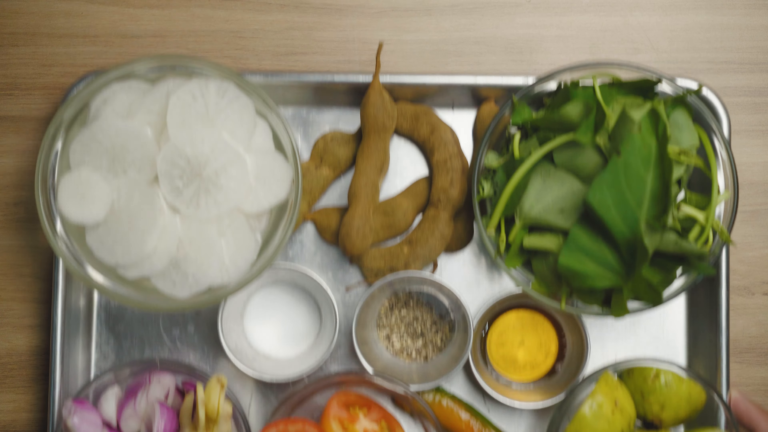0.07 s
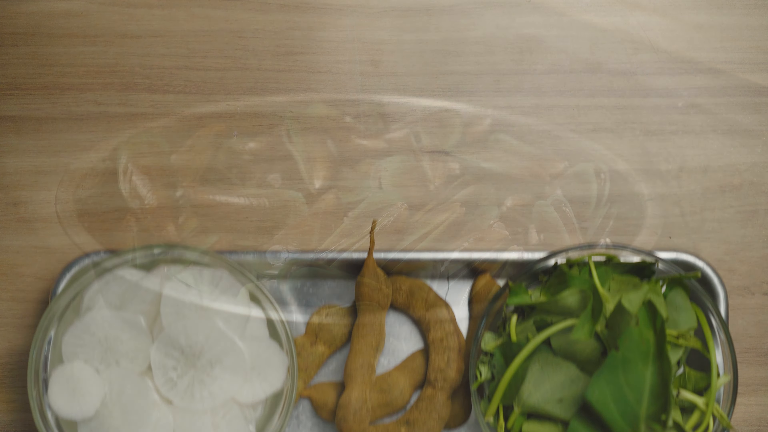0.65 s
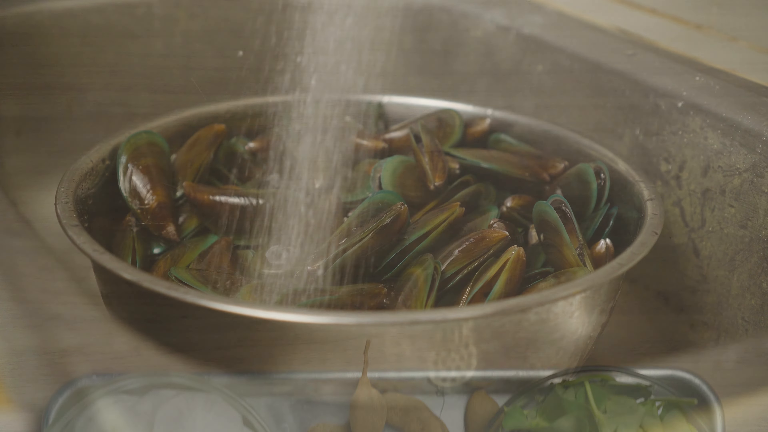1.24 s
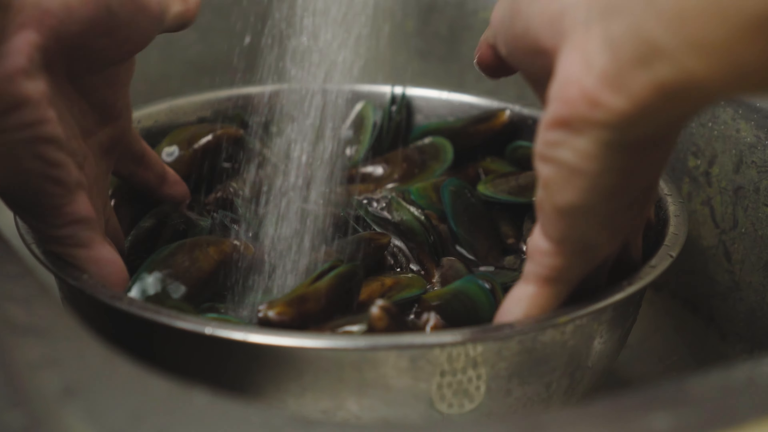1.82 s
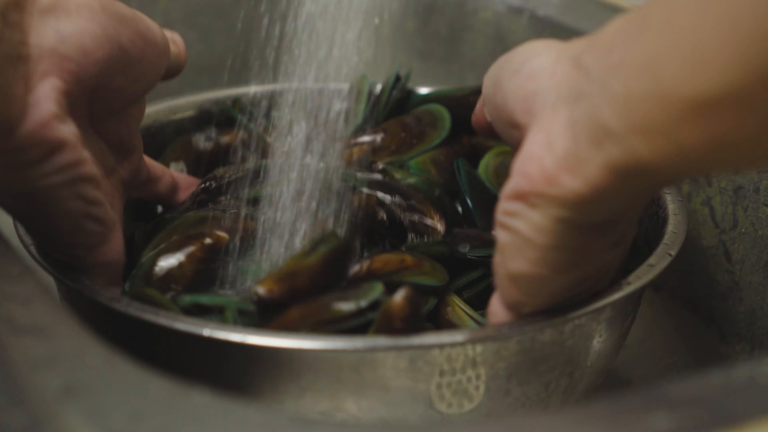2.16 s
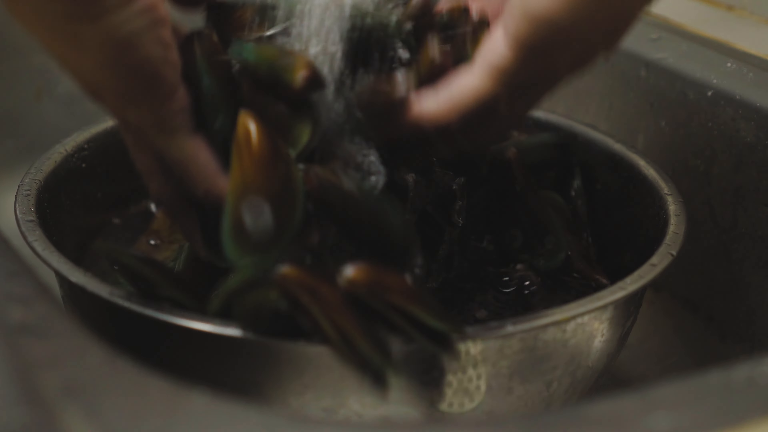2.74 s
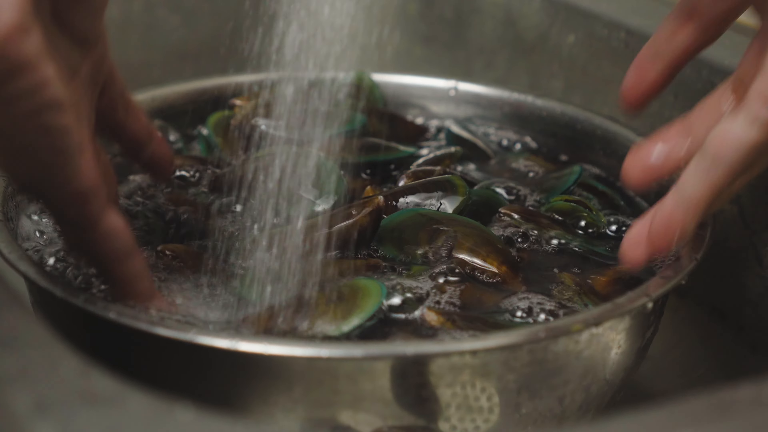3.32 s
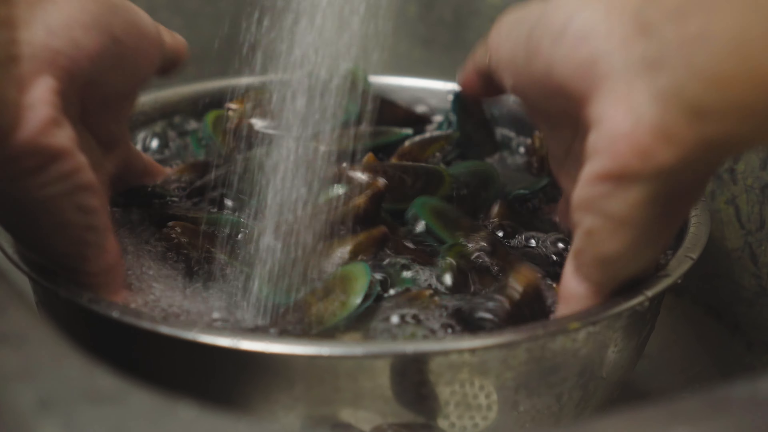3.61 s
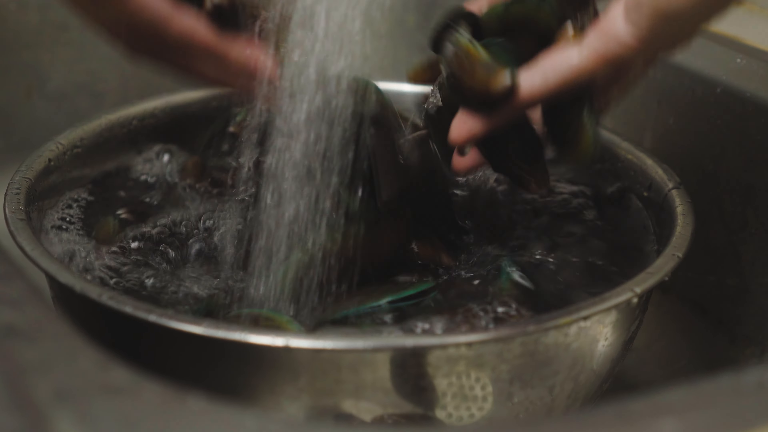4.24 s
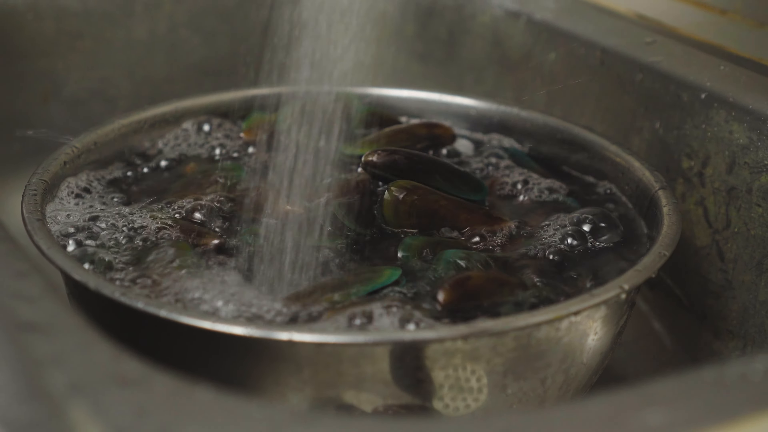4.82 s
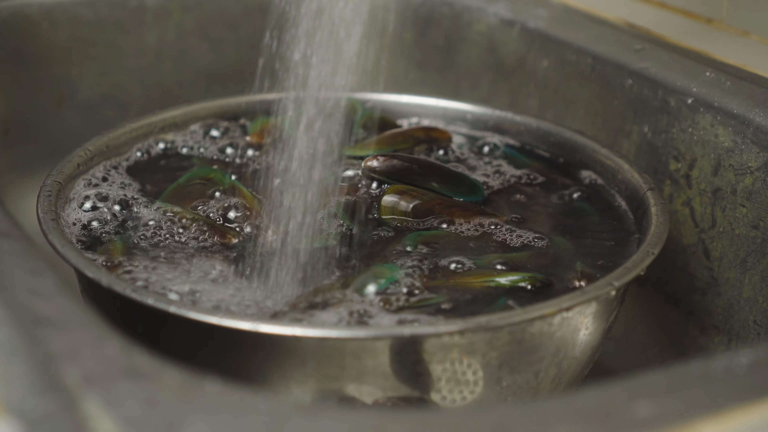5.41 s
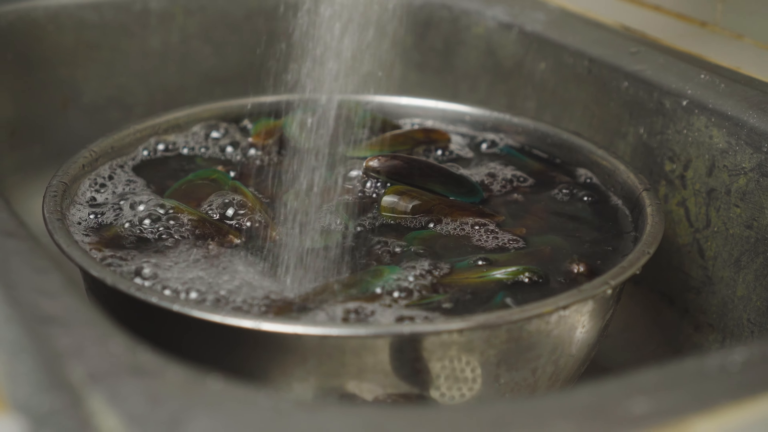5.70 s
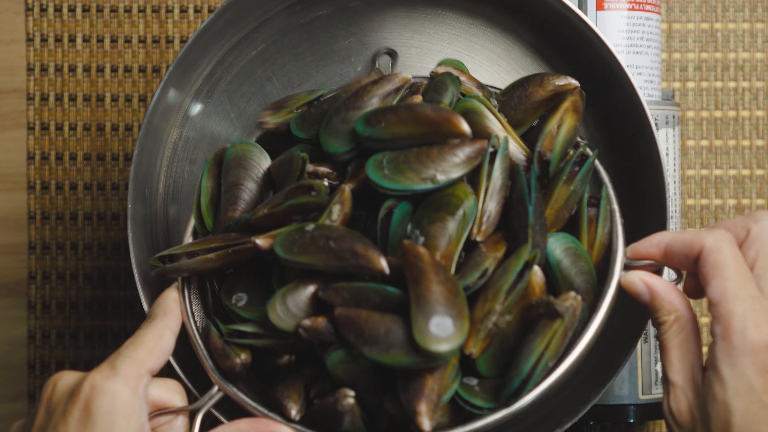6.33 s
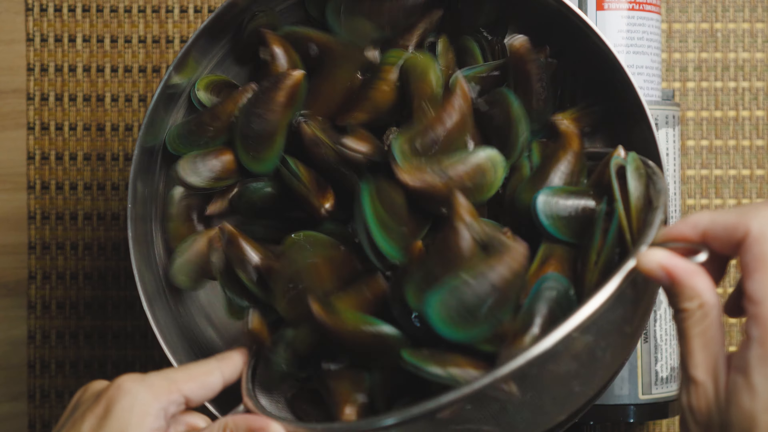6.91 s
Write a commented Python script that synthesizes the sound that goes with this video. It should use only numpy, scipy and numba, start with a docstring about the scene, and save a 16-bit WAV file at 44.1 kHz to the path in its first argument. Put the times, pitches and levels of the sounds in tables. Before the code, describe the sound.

A steel tray slides over a wooden counter with a soft, fading hiss. A spray tap spurts on and spatters onto mussels in a steel bowl, growing bubblier as water gathers. Hands scoop the shells twice and let them fall, clacking, while the bowl rumbles and thumps in the sink. The water dies away, and the mussels clatter into a ringing steel pot. The microphone is close, in a small kitchen.

```python
"""A small kitchen, one microphone close to the sink. A steel tray slides over the wooden counter, hissing
with fine stick-slip. A spray tap spatters onto mussels in a steel bowl and bubbles as the water gathers.
Two hands scoop the shells up twice and let them fall, clacking, while the bowl rumbles and thumps on the
sink floor. The water dies away and the mussels are tipped from a strainer into a ringing steel pot."""
import sys
import numpy as np
from scipy import signal
from scipy.fft import rfft, irfft
from scipy.io import wavfile
from scipy.ndimage import uniform_filter1d
from numba import njit

SR = 44100
rng = np.random.default_rng(int(sys.argv[2]) if len(sys.argv) > 2 else 0)


def wav_out(sig):
    """Save sig, one row per channel (or a flat mono array), as 16-bit PCM at SR to the path in sys.argv[1]."""
    wavfile.write(sys.argv[1], SR, np.round(np.clip(np.atleast_2d(sig).T, -1, 1) * 32767).astype(np.int16))


N = 311346
TIME = np.arange(N) / SR
TOP_HZ = 16000

# the two scoops: hands dig in t/s, taking hold/s, pressing on the bowl/s, shells in motion/s
SCOOPS = [(1.854, 0.0073, 0.52, 1.405), (3.696, 0.066, 0.17, 1.084)]


def spray():
    """Droplets spatter on bare shells; as the bowl fills they land in water and blow small bubbles."""
    # spectrum of drops on shell: f/Hz, level/dB
    on_shells = [(350, -50), (600, -34), (894, -23.5), (1040, -6.5), (1780, -14.5), (3040, -14),
                 (4050, -5.5), (6730, -5.5), (14900, -5), (16000, -16.5)]
    # spectrum of drops on water: f/Hz, level/dB
    on_water = [(400, -51.5), (700, -30), (1000, -8), (1300, -2.5), (1850, -5), (2250, -0.5), (2750, 1.5),
                (3100, -1.5), (3600, 3), (4500, -2), (7200, 0), (10000, -1), (16000, -8)]
    filled = np.interp(TIME, [2.3, 4.8], [0, 1])
    drops = impacts(6000, 3.8) * flutter(260, 2.8)
    spatter = steady(colour(drops, on_shells), 5400, 24000)
    bubbles = steady(grains(3000, 3.5, 26, 700, 16000, glide=.12), 900, 16000)
    splashes = steady(impacts(9000, 2.5), 900, 16000)
    froth = colour((bubbles + splashes) * flutter(260, 2.66), on_water)
    froth = steady(froth, 8200, 16000)
    return undb(.5) * (np.sqrt(1 - filled) * spatter + np.sqrt(filled) * froth) * jet()


def jet():
    """Strength of the jet: an opening surge, a hush on the heaped handful, a fall as the valve closes."""
    opens_s, shut_s, closing_s = 1.19, 6.337, .54
    valve = np.clip((shut_s - TIME) / closing_s, 0, 1) ** 1.83
    surge_db = 9.5 * np.exp(-np.maximum(TIME - opens_s, 0) / .42)
    hush_db = -11 * swell(3.33, .38)
    return undb(-35.5 + surge_db + hush_db) * valve * gate(opens_s, shut_s, .011, .01)


def spurts():
    """Slugs of water slap the shells as the tap opens, with a soft gurgle underneath."""
    # first slugs out of the tap: t/s, relative level/dB
    slugs = [(1.1788, -11), (1.2026, -6.5), (1.229, -4), (1.3, -4), (1.331, -9)]
    slaps = band(sum(undb(db) * burst(s, t60=.028) for s, db in slugs), 3350, 8100)
    gurgle = steady(band(impacts(400, 1.5), 337, 496), 300, 520) * swell(1.27, .045)
    return undb(.5) * slaps + undb(-41.5) * gurgle


def pool():
    """The jet bubbles in the gathered water; the hollow of the bowl favours three bands."""
    bubbles = grains(700, 2.7, 35, 1000, 4350, glide=.15)
    favoured = (band(bubbles, 1270, 1470) + undb(5) * band(bubbles, 2730, 2740)
                + undb(-5) * band(bubbles, 3450, 3800))
    return undb(-45.5) * steady(favoured, 900, 4000) * gate(4.9, 5.95, .03, .059)


def hollow():
    """The jet drums in a hollow between the shells until the hands first dig in."""
    drumming = steady(band(impacts(900, 2.5), 960, 1160), 850, 1300)
    return undb(-40.5) * drumming * gate(1.533, SCOOPS[0][0], .058, .014)


def trickle():
    """As the valve closes, the last drops blow tiny bubbles in the full bowl, ever more faintly."""
    from_s, to_s, fade_db_per_s = 6.09, 6.42, 73
    drips = steady(band(grains(260, 3.4, 30, 2000, 7200, glide=.12), 2500, 5500), 2000, 7000)
    fade = undb(-51.5 - fade_db_per_s * np.maximum(TIME - from_s, 0))
    return drips * fade * gate(from_s, to_s, .08, .01)


def hands():
    """How hard the hands drive shell faces, shell edges and the bowl: scoops, with shoves on top."""
    # shoves through the shells: t/s, length/s, face drive/dB, edges relative to faces/dB, bowl drive/dB
    shoves = [(1.864, 0.027, -28, -25, -29), (2.012, 0.023, -35, -5, -29.5),
              (2.25, 0.048, -21.5, -12, -26.5), (2.473, 0.022, -17.5, -6, -36),
              (2.567, 0.086, -25.5, 3, -36.5), (2.70, 0.047, -18.5, 0.5, -39.5),
              (2.788, 0.013, -15.5, 2, -31), (2.975, 0.18, -24.5, -1.5, -42), (3.708, 0.15, -32, -3, -32),
              (3.865, 0.11, -17.5, -6, -35.5), (4.047, 0.17, -24.5, -9, -45),
              (4.15, 0.092, -19.5, -4.5, -37.5), (4.257, .11, -19, 1.5, -35), (4.557, 0.049, -24, 6, -38.5),
              (4.69, 0.067, -31, 7.5, -53), (4.837, 0.033, -26.5, -3, -46)]
    release_s = .024
    moving = sum(gate(s, s + length, grip, release_s) for s, grip, _, length in SCOOPS)
    pressing = sum(gate(s, s + press, grip, release_s) for s, grip, press, _ in SCOOPS)
    jostle = undb(-37.5) * moving
    faces, edges = [jostle], [jostle]
    rumble = [undb(-39) * pressing, undb(-47.5) * moving]
    for s, length, face_db, edge_db, rumble_db in shoves:
        shove = gate(s, s + length, .017, .056)
        faces.append(undb(face_db) * shove)
        edges.append(undb(face_db + edge_db) * shove)
        rumble.append(undb(rumble_db) * shove)
    return together(faces), together(edges), together(rumble)


def shells(face_drive, edge_drive):
    """Handfuls of shells grind and tumble: flat faces knock low, edges tick high."""
    # spectrum of tumbling shells: f/Hz, level/dB
    spectrum = [(300, -37.5), (550, -10.5), (750, -4.5), (1150, 5), (2000, 1.5), (4000, -7.5),
                (7000, -12.5), (9000, -21), (16000, -26)]
    # single knocks of shell on shell: t/s, relative level/dB, f/Hz, crack offset/dB
    collisions = [(1.0961, -22.5, 3960, -15), (2.0367, -7.5, 3420, -11), (2.4985, 1, 2800, -28),
                  (2.5478, 0, 3220, -19), (2.6373, 4, 4610, -32.5), (2.696, 5, 3320, -23.5),
                  (2.7848, -3.5, 3840, -22), (2.7943, -3.5, 1000, -17.5), (2.801, -0.5, 2130, -22),
                  (2.8174, -3, 2130, -14.5), (2.9379, -7, 1150, -14.5), (3.2941, -10.5, 3850, -24),
                  (3.7187, -6.5, 1410, -22), (3.851, -6, 1310, -32), (4.1353, -2.5, 1180, -24),
                  (4.2113, -5, 1070, -27), (4.252, 5, 3280, -21), (4.2933, -1.5, 2440, -15),
                  (4.348, -4, 3280, -22), (4.4945, -5.5, 4470, -6), (4.5308, -4.5, 1620, -9),
                  (4.5628, 0, 2700, -15), (4.581, 3, 2690, -14.5), (4.607, 1.5, 2890, -17),
                  (4.7034, 2, 2230, -18.5), (4.8046, 1.5, 1650, -31), (4.8181, 1, 1630, -15.5),
                  (4.8417, -3, 1510, -11.5)]
    faces = grains(650, 2.7, 17, 600, 4200, count=3) * flutter(70, 2)
    edges = grains(650, 3.0, 22, 2600, 15000, count=4) * flutter(70, 2)
    faces = steady(colour(faces, spectrum), 800, 4200) * face_drive
    edges = steady(colour(edges, spectrum), 3000, 5300) * edge_drive
    knocks = clacks(collisions, cycles=33, crack_db=14.5, chatter_db=-8, chatter_t60=.034)
    return undb(-2.5) * faces + undb(-3.5) * (edges + knocks)


def clacks(table, cycles, crack_db, chatter_db, chatter_t60):
    """Each blow is a sharp crack, a brief inharmonic ring and a chatter as the shell settles."""
    sizes = np.array([.7, .22, .22, -.14])
    out = np.zeros(N)
    for s, db, hz, offset_db in table:
        ratios = np.array([1, rng.uniform(.7, .9), rng.uniform(1.1, 1.4), rng.uniform(1.6, 2.4)])
        life = cycles * ratios * np.sqrt(hz / 1500)
        ring = rings(np.full(4, s), np.minimum(hz * ratios, TOP_HZ), life, sizes, 0.)
        chatter = band(burst(s, chatter_t60), hz / 1.14, hz * 1.42)
        crack = burst(s, t60=.015) * undb(crack_db + offset_db)
        out += undb(db) * (ring + undb(chatter_db) * chatter / np.abs(chatter).max() + crack)
    return band(out, 1000, 21000, order=4)


def bowl(drive):
    """The bowl judders on the sink under the hands, booms as a handful drops and hums under the jet."""
    # spectrum of the judder: f/Hz, level/dB
    spectrum = [(30, -43.5), (100, -20.5), (212, 1), (270, -2.5), (430, 0), (700, -14.5), (1300, -37)]
    # modes of the water-loaded bowl on the sink floor: f/Hz, level/dB, t60/s
    modes = [(399, -4.5, 0.071), (417.4, -15.5, .27), (449.6, 0.5, 0.091), (492, -11.5, 0.39),
             (590, -12, 0.02), (950, -20, 0.23)]
    # blows on the bowl's bottom: t/s, relative level/dB
    thumps = [(2.021, -24), (2.8605, -2), (2.886, -5), (2.923, -3), (2.965, -8.5), (3.068, -15)]
    judder = steady(colour(impacts(450, 2.2), spectrum), 120, 600)
    falling = gate(2.89, 3.01, .011, .057)
    patter = steady(struck(impacts(400, 2.4), modes), 120, 600) * falling
    boom = band(undb(-17.5) * patter + undb(3) * struck(blows(thumps), modes), 410, 3000)
    hum = steady(band(impacts(2000, 2), 150, 600, order=1), 120, 600) * jet()
    return undb(-1.5) * judder * drive + boom + undb(-37) * hum


def plops():
    """Trapped air rings for a few dozen cycles, rising a little in pitch."""
    # air pockets closing over the dropped shells: t/s, f/Hz, level/dB
    pockets = [(2.925, 916, -20), (2.979, 892, -11), (3.001, 935, -13)]
    s, hz, db = np.array(pockets, float).T.copy()
    return band(rings(s, hz, np.full(len(s), 70.), undb(db), glide=.032), 501, 3010)


def pot():
    """A few shells creep ahead, then the rest rain into the pot; it rings most while its bottom is bare."""
    # spectrum of pouring shells: f/Hz, level/dB
    spectrum = [(59, -63), (100, -23), (365, -23), (595, 1.5), (768, -12.5), (1030, 1), (1310, -11),
                (2690, -2.5), (7140, -5), (16000, -19.5)]
    # single shells landing: t/s, relative level/dB, f/Hz, crack offset/dB, blow to the steel/dB
    landings = [(6.434, -25.5, 2370, 2.5, -29.5), (6.462, -15.5, 3210, -12.5, -37.5),
                (6.523, -5, 6870, -7.5, -24), (6.541, -6, 3220, -5, -12.5), (6.577, -8, 2700, 4, -18),
                (6.599, -14, 1760, -2, -9.5), (6.634, -9, 2780, -19, -11), (6.662, -6.5, 2640, -12, -23),
                (6.711, -10, 1410, -10, -35), (6.73, -3.5, 3500, -11, -12), (6.755, -16.5, 1850, 10, -21),
                (6.806, -9, 7100, -1, -16), (6.864, -5, 1730, -5, -14), (6.922, -5, 3790, -12, -15)]
    # modes of the steel pot: f/Hz, level/dB, t60/s
    modes = [(515, -7, .4), (590, -4, .3), (1066, -10, .25), (1200, -8, .3), (1766, 0, .55),
             (2369, -12, .3), (2715, -3, .35), (3316, -9, .16), (5583, -9, .35), (7197, -12, .3),
             (8385, -15, .25)]
    creep_s, pour_s, build_s = 6.465, 6.52, .18
    slide = undb(-17) * (1 - np.exp(-np.maximum(TIME - pour_s, 0) / build_s))
    flow = slide + undb(-46) * gate(creep_s, pour_s, .012, .031)
    shower = grains(650, 2.8, 26, 350, 16000, count=5) * flutter(70, 2)
    shower = steady(shower, 800, 8000) + undb(-13) * steady(impacts(3500, 2.5), 800, 8000)
    clatter = steady(colour(shower, spectrum), 800, 8800)
    thud = steady(band(impacts(300, 1.2), 35, 250), 35, 250)  # the weight shakes the stove
    hits = clacks([row[:4] for row in landings], cycles=43, crack_db=11, chatter_db=-1, chatter_t60=.084)
    # hard edges wake mostly the high modes, the sliding mass all of them
    strikes = band(blows([(row[0], row[4]) for row in landings]), 900, 16000, order=1)
    bare = undb(np.interp(TIME, [6.65, 7.0], [0, -9]))
    push = undb(.5) * strikes + undb(-11.5) * impacts(340, .43) * slide * bare
    buzz = flutter(120, 3.3)  # shells lying on the steel buzz against it
    ring = band(struck(push, modes), 630, 13000) * buzz
    return (clatter + undb(-33) * thud) * flow + undb(-2) * hits + ring


def tray():
    """Fine stick-slip of steel on wood: a hiss that fades as the tray moves off, swishes where it drags."""
    # spectrum of the sliding tray: f/Hz, level/dB
    spectrum = [(35, -34), (60, -16), (184, -18.5), (268, -8), (323, -23), (398, -6.5), (527, -17),
                (682, -7), (1620, -3), (6900, -6.5), (12100, -8.5), (16000, -11)]
    # moments of harder drag: t/s, half length/s, f/Hz, level/dB
    drags = [(0.122, 0.045, 1310, -33.5), (0.32, 0.096, 38, -53), (0.385, 0.092, 12500, -36),
             (0.47, 0.18, 840, -53.5), (0.562, 0.045, 5100, -38.5), (0.793, 0.05, 374, -51.5),
             (0.84, 0.26, 12700, -48.5)]
    stops_s, fade_db_per_s = 1.18, 15.5
    hiss = steady(colour(impacts(14000, 3.0), spectrum), 2200, 8000)
    sound = hiss * undb(-37.5 - fade_db_per_s * TIME) * gate(0, stops_s, .01, .026)
    for s, half_s, hz, db in drags:
        swish = band(impacts(7400, .86), hz / 1.51, hz * 1.33)
        sound += undb(db) * swish / swish.std() * swell(s, half_s)
    return sound


def reflections(x, delay_s, t60, top_hz):
    """Nearby walls return the sound as a dense decaying echo of unit energy."""
    age = TIME[:SR // 2]
    tail = band(rng.standard_normal(len(age)), 240, top_hz, order=1)
    tail *= undb(-60 * age / t60) * (age > delay_s)
    return signal.fftconvolve(x, tail / np.sqrt(np.sum(tail ** 2)))[:N]


def room_tone():
    """Still kitchen air: a very faint low noise."""
    return undb(-75) * band(rng.standard_normal(N), 25, 300, order=1)


def impacts(rate, spread_db):
    """Tiny random impulses, rate a second, mostly weak, a few strong."""
    chosen = rng.random(N) < rate / SR
    return chosen * rng.choice([-1, 1], N) * undb(spread_db * np.minimum(rng.exponential(size=N), 4))


def grains(rate, spread_db, cycles, lo_hz, hi_hz, glide=0., count=1):
    """Random contacts or bubbles, each with count short rings of its own; even energy per Hz."""
    chance = rng.random((int(rate * N / SR), 2 + 2 * count))
    start = np.repeat(chance[:, 0] * (N - 1) / SR, count)
    size = np.repeat(undb(spread_db * np.minimum(-np.log(chance[:, 1]), 4)), count)
    hz = lo_hz * (min(hi_hz, .4 * SR) / lo_hz) ** chance[:, 2::2].ravel()
    life = cycles * (.5 + chance[:, 3::2].ravel())
    polarity = (-1) ** np.arange(len(hz))
    return rings(start, hz, life, size * hz / hi_hz * polarity, float(glide))


@njit
def rings(start, hz, cycles, size, glide):
    """Damped sines, each 60 dB down after its number of cycles; glide raises the pitch as it fades."""
    out = np.zeros(N)
    for k in range(len(start)):
        first, length = int(start[k] * SR), int(cycles[k] / hz[k] * SR) + 2
        phase, amplitude, fade = 0., size[k], np.exp(-6.9 / length)
        for i in range(max(0, min(length, N - first))):
            phase += 2 * np.pi * hz[k] / SR * (1 + glide * i / length)
            out[first + i] += amplitude * np.sin(phase)
            amplitude *= fade
    return out


def burst(s, t60):
    """A puff of noise that starts at once and dies away; peak 1."""
    age = TIME[:SR // 10]
    puff = rng.standard_normal(len(age)) * undb(-60 * age / t60)
    return np.pad(puff / np.abs(puff).max(), (int(s * SR), N))[:N]


def blows(table):
    """One impulse for each row of t/s, level/dB."""
    return sum(undb(db) * (np.arange(N) == int(s * SR)) for s, db in table)


def struck(push, modes):
    """A push played through the ringing modes of a vessel; a unit blow peaks at 1."""
    age = TIME[:SR]
    ring = sum(undb(db - 60 * age / t60) * np.sin(2 * np.pi * hz * age) for hz, db, t60 in modes)
    return signal.fftconvolve(push, ring / np.abs(ring).max())[:N]


def band(x, lo_hz, hi_hz, order=2):
    """Butterworth band-pass."""
    sos = signal.butter(order, [lo_hz, min(hi_hz, .48 * SR)], "band", fs=SR, output="sos")
    return signal.sosfilt(sos, x + 1e-18)


def colour(x, points):
    """Causal filter through points of f/Hz, level/dB, built from the cepstrum."""
    hz, db = np.transpose(points)
    size = 4096
    bin_hz = np.arange(size // 2 + 1) * SR / size
    log_gain = np.log(undb(np.interp(np.log(bin_hz + 1), np.log(hz), db)))
    cepstrum = irfft(log_gain)[:size // 2]
    cepstrum[1:] *= 2
    return signal.fftconvolve(x, irfft(np.exp(rfft(cepstrum, size))))[:N]


def steady(x, lo_hz, hi_hz):
    """Unit level inside a band over each tenth of a second; faster grain stays."""
    power = uniform_filter1d(uniform_filter1d(band(x, lo_hz, hi_hz) ** 2, SR // 10), SR // 20)
    return x / np.sqrt(np.abs(power) + 1e-12)


def flutter(rate, depth_db):
    """A gain that wanders at random, rate times a second."""
    knots = rng.standard_normal(8000)
    return undb(depth_db * np.interp(TIME * rate, np.arange(len(knots)), knots))


def gate(start, end, attack, release):
    """A gain that reaches 1 at start and dies away after end; attack and release are time constants."""
    return np.exp(-np.maximum(start - TIME, 0) / attack - np.maximum(TIME - end, 0) / release)


def swell(peak_s, half_s):
    """A bell curve in time, peaking at 1."""
    return np.exp(-((TIME - peak_s) / half_s) ** 2)


def together(gains):
    """Unrelated sounds add in power."""
    return np.sqrt(sum(gain ** 2 for gain in gains))


def undb(db):
    """Decibels to gain."""
    return 10 ** (np.asarray(db) / 20)


def scene():
    """Close up, in mono: water, shells and steel echo off sink and kitchen walls; the tray stays dry."""
    faces, edges, rumble = hands()
    water = spray() + pool() + hollow() + trickle() + spurts()
    near = water + shells(faces, edges) + bowl(rumble) + plops() + pot()
    sink = undb(-14) * reflections(near, delay_s=.002, t60=.06, top_hz=7000)
    kitchen = undb(-18) * reflections(near, delay_s=.008, t60=.22, top_hz=6000)
    return (near + sink + kitchen + room_tone() + tray())[None]


def record(dry):
    """The recorder rounds the highest peaks and cuts the top."""
    rounded = dry / (1 + dry ** 4) ** .25
    return signal.sosfilt(signal.ellip(10, .2, 80, TOP_HZ, fs=SR, output="sos"), rounded)


dry = scene()
out = record(dry)
wav_out(out)
```